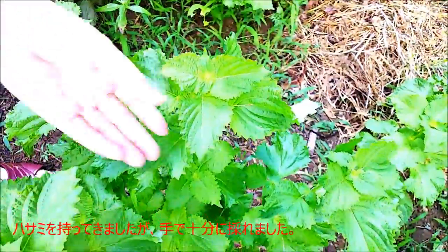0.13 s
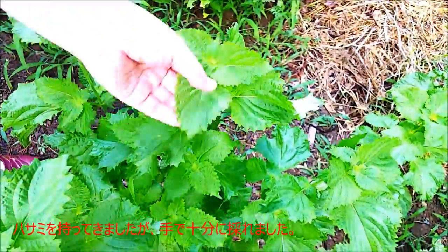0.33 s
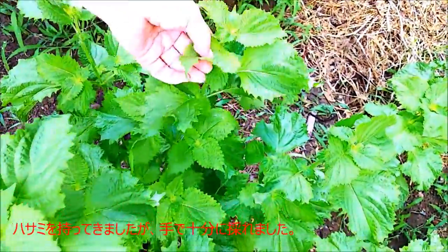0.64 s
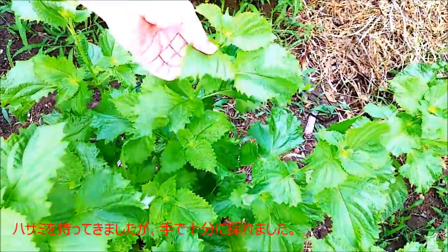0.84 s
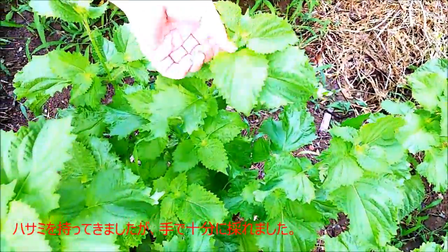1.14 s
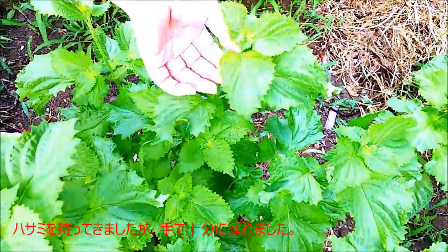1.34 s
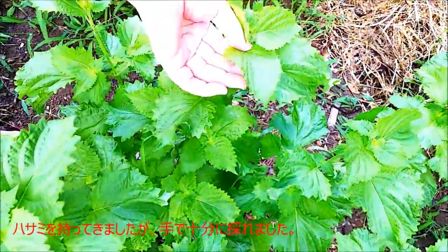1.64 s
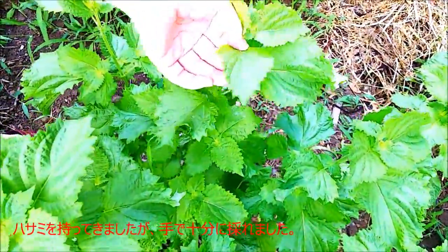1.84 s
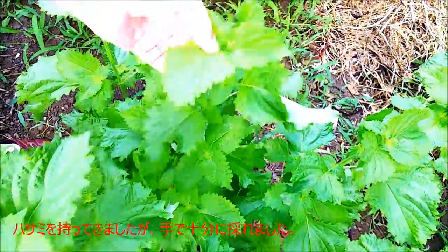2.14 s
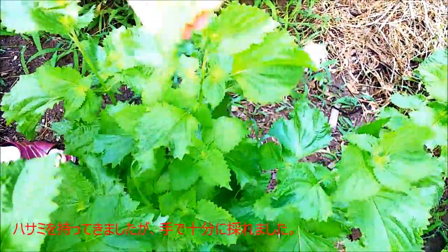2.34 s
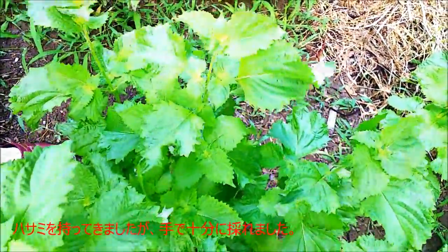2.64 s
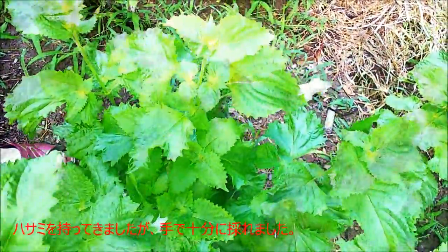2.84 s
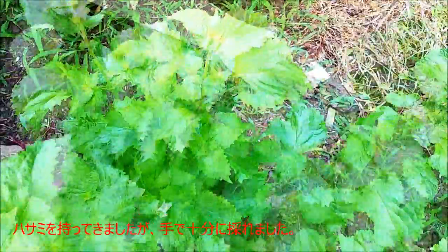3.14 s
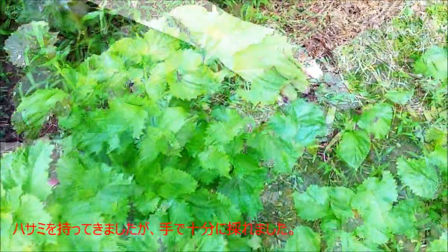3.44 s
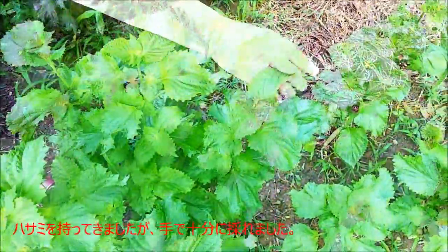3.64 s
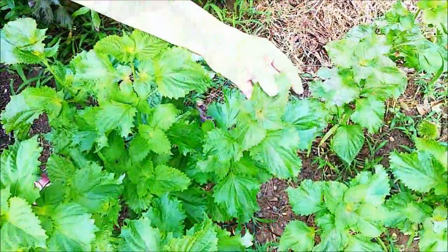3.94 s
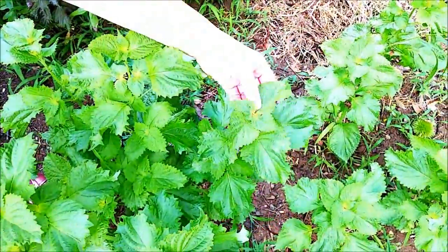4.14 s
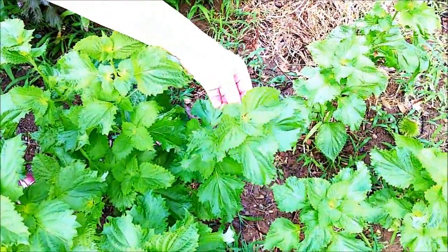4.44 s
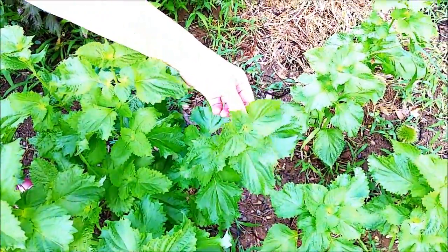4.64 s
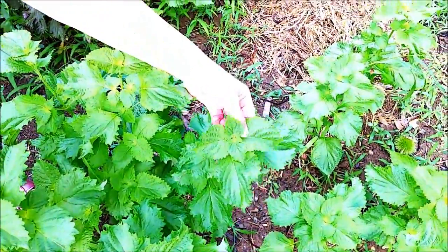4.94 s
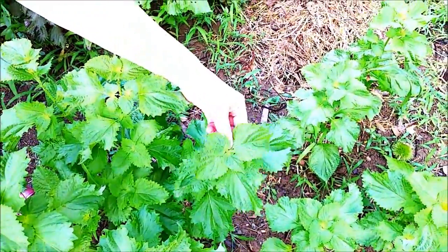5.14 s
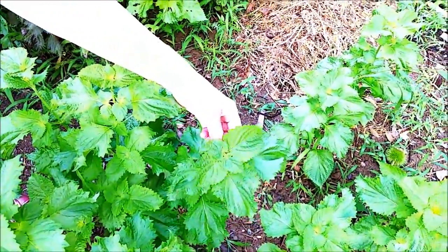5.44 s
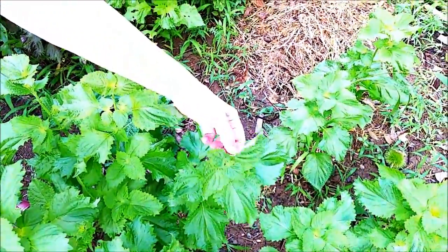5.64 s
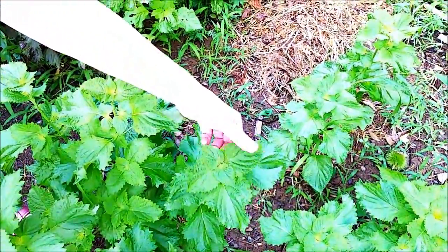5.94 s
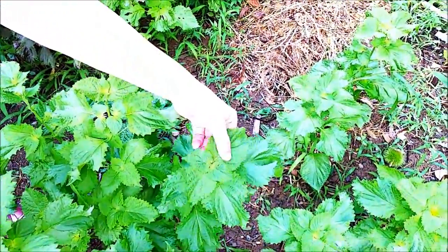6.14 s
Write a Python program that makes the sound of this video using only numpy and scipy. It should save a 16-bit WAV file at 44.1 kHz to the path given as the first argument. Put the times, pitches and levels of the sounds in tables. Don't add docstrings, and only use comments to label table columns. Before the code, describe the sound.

Shrill cicada chorus drones steadily outdoors in a garden, with faint microphone bumps, one small plant stem snap and a distant hoarse crow caw.

```python
import sys
import numpy as np
from scipy import signal
from scipy.fft import rfft, irfft, next_fast_len
from scipy.io import wavfile
from scipy.ndimage import uniform_filter1d, map_coordinates

SR = 44100
rng = np.random.default_rng(int(sys.argv[2]) if len(sys.argv) > 2 else 0)


def to_wav(sig):
    pcm = np.clip(np.atleast_2d(sig), -1, 1) * 32767
    pcm = np.round(pcm).astype(np.int16)
    wavfile.write(sys.argv[1], SR, pcm.T)


def magnitude_from_level(level_db):
    exponent = np.asarray(level_db, float) / 20
    return 10 ** exponent


N = 277830

# time in seconds, share of the second spell
SECOND_SHARE = [(0, 0), (2.56, 0), (2.59, .5), (4.06, .5), (4.09, 1), (6.3, 1)]
# frequency in Hz, level in dB per Hz.
NEAR_BODY = [
    [(4000, -31), (6800, -13.5), (7790, 0), (8540, 1), (9020, -2.5), (9370, -7.5), (10000, -42), (13000, -74), (22000, -120)],
    [(4000, -33.5), (6800, -13.5), (8270, 0.5), (8770, 1), (9330, -7.5), (9600, -11), (10000, -51.5), (13000, -49), (22000, -120)],
]
# frequency in Hz, level in dB per Hz.
FAR_BODY = [
    [(2530, -34), (4300, -10), (4660, -7.5), (5900, -4.5), (7000, 0.5), (9100, -53), (15400, -120)],
    [(2530, -43), (4300, -6), (5080, -6), (5730, -1), (6580, -2.5), (7000, -2.5), (9100, -16), (15400, -120)],
]
# frequency in Hz, level in dB per Hz.
OVERTONE = [
    [(9600, -40), (10000, -9), (10400, -7.5), (10750, -2.5), (11500, 0), (13500, -2.5), (14300, -7), (15000, -40)],
    [(9600, -40), (10000, -9), (10400, -8), (11000, -6), (11300, 0), (13500, -3.5), (14300, -7), (15000, -40)],
]
# frequency in Hz, level in dB per Hz.
TOWN = [
    [(15, -57), (25, -70), (53, -20.5), (120, -0.5), (162, -5.5), (352, -7), (573, -11), (690, -12.5), (950, -8.5), (1400, -16.5), (1820, -52), (3080, -120)],
    [(15, -58), (25, -52), (64, -16), (91, -4.5), (124, -2.5), (297, -6), (409, -12), (831, -5.5), (1070, -10.5), (1400, -13.5), (1820, -73), (3080, -120)],
]
# frequency in Hz, level in dB per Hz.
LEAVES = [
    [(710, -47), (1200, -12), (1380, -5.5), (1680, -4), (2040, -1), (3190, -1.5), (4600, -13), (5980, -45), (10100, -120)],
    [(710, -55), (1200, -11), (1310, -4.5), (2460, -0.5), (2680, 1), (3690, -1.5), (4600, -21), (5980, -66), (10100, -120)],
]
# frequency in Hz, likeness (0 to 1).
LIKENESS = [(50, 0.59), (140, .85), (400, .7), (700, 0.21), (1300, .5), (2500, 0.33), (4200, 0.13),
            (4700, .05), (14000, 0.059)]
# frequency in Hz, left minus right in dB.
LEFT_LEAN = [(60, -3), (150, -2), (700, -4), (1500, 0), (2500, 1.5), (4500, 0.5)]
# start in seconds, level in dB.
BUMPS = [
    (0.049, -52),
    (.1, -43),
    (0.151, -45),
    (.2, -41),
    (.58, -44),
]
# start in seconds, level in dB, pitch in Hz, time to fall 60 dB in seconds.
STEM_RINGS = [
    (2.1025, -33, 2400, .012),
    (2.119, -24.5, 1500, 0.013),
    (2.1192, -25.5, 2500, 0.0083),
    (2.1195, -32, 2900, 0.015),
    (2.1197, -26.5, 1250, 0.014),
    (2.1193, -32, 900, 0.019),
    (2.12, -19.5, 690, 0.022),
    (2.119, -34, 257, 0.064),
]
# time in seconds, pitch in Hz, level in dB.
CAW = [
    (3.79, 258, -70),
    (3.805, 257.4, -44),
    (3.84, 276, -44),
    (3.87, 270, -43),
    (3.92, 264, -45),
    (3.96, 262, -41),
    (3.99, 250.7, -46),
    (4.01, 250, -52),
    (4.06, 241, -70),
]
# frequency in Hz, width in Hz, level in dB.
THROAT = [
    (1340, 150, -1.5),
    (1590, 240, -1.5),
]
# frequency in Hz, step in dB.
ROUNDING_STEPS = [(50, -50), (500, -47.5), (1200, -42.5), (1700, -38.5), (2300, -35), (4600, -34),
                  (5500, -34.5), (7000, -33.5), (10500, -34), (12000, -38.5), (13500, -41), (14300, -40.5)]
# start in seconds, end in seconds.
WIDE_SPANS = [(0, .185), (.215, .39), (.55, .78), (1.13, 1.29), (1.63, 1.89), (1.96, 2.14), (2.5, 2.7),
              (2.79, 2.93), (3.16, 3.3), (3.57, 3.68), (3.85, 4.02), (4.06, 4.11), (4.31, 4.55),
              (4.61, 4.79), (4.99, 5.17), (5.21, 5.4), (5.53, 5.73), (5.83, 6.11), (6.28, 6.4)]
# frequency in Hz, share of bands (0 to 1).
STRAY_WIDE = [(4500, .2), (7000, .27), (9600, .32), (10500, 0.12), (14400, .07)]
# frequency in Hz, share of strips (0 to 1).
SILENT_STRIPS = [(1000, 0), (1400, .06), (2200, .04), (2900, .19), (5200, .21), (5800, .03), (7000, 0),
                 (11000, 0), (12000, .14), (14300, .25)]


def unit(x):
    return x / np.sqrt(np.mean(x ** 2, axis=-1, keepdims=True) + 1e-20)


def along(points, x):
    place, value = np.transpose(points)
    return np.interp(np.log(x + 1), np.log(place + 1), value)


def curves(rows):
    seconds, *columns = np.transpose(rows)
    return [np.interp(np.arange(N) / SR, seconds, column) for column in columns]


def wobble(rate):
    knots = rng.standard_normal(int(N * rate / SR) + 4)
    return map_coordinates(knots, [np.arange(N) * rate / SR])


def filtered(x, response):
    size = next_fast_len(N + 8192)
    hz = np.fft.rfftfreq(size, 1 / SR)
    return irfft(rfft(x, size) * response(hz), size)[..., :N]


def spread(pair, spectra):
    def response(hz):
        turn = np.arccos(np.clip(along(LIKENESS, hz), 0, 1)) / 2
        colour = magnitude_from_level([[along(spectrum, hz)] for spectrum in spectra])
        return colour * [np.cos(turn), np.sin(turn)]

    share, = curves(SECOND_SHARE)
    first, second = filtered(pair, response)
    mid, side = (1 - share) * first / np.linalg.norm(first) + share * second / np.linalg.norm(second)
    return np.sqrt(N) * np.array([mid + side, mid - side])


def patchy(x, patchy_db, size, count=10, order=9):
    z = signal.stft(x, nperseg=2 ** order)[2]
    field = uniform_filter1d(rng.standard_normal(z.shape[1:]), size, 0)
    field = uniform_filter1d(field, count, 1)
    z = z * magnitude_from_level(patchy_db * field / field.std())
    return signal.istft(z, nperseg=2 ** order)[1][:, :N]


def both(first_db, second_db):
    share, = curves(SECOND_SHARE)
    on = np.clip(2 * np.array([1 - share, share]), 0, 1)
    return 10 * np.log10(on[0] * magnitude_from_level(2 * first_db) + on[1] * magnitude_from_level(2 * second_db))


def clicks(rate, jitter, scatter_db, swell_db, count):
    out = np.zeros(N)
    for own in np.exp(.35 * rng.standard_normal(count)):
        gaps = SR / (rate * own) * np.exp(jitter * rng.standard_normal(N // 55))
        at = np.cumsum(gaps).astype(int)
        size = magnitude_from_level(scatter_db * rng.standard_normal(len(at))) * rng.choice([-1, 1])
        train = np.bincount(at[at < N], size[at < N], N)
        out += unit(train - train.mean()) * magnitude_from_level(swell_db * wobble(7))
    return unit(out)


def crowd(rate, far_share, swell_db):
    near = np.array([clicks(rate, jitter=.12, scatter_db=2.5, swell_db=swell_db, count=9) for _ in "ab"])
    return np.sqrt(1 - far_share) * near + np.sqrt(far_share) * rng.standard_normal((2, N))


def chorus_levels():
    t = np.arange(N) / SR
    near_db = both(-24.0, -24.0 + 0.72 * np.maximum(t - 4.7, 0))
    joining_db = 2 * np.minimum(t / 2.3, 1)
    second_start_s = SECOND_SHARE[1][0]
    fading_db = 5.5 * np.exp(-np.maximum(t - second_start_s, 0) / 1.1)
    far_db = both(-37 + joining_db, -36 + fading_db)
    overtone_db = np.interp(curves(SECOND_SHARE)[0], [0, 1], (-25.5, -26))
    return near_db, far_db - near_db, overtone_db


def cicadas():
    near_db, far_db, overtone_db = chorus_levels()
    song = crowd(300, far_share=.55, swell_db=0.9)
    overtone = spread(patchy(song, patchy_db=1.6, size=8), OVERTONE)
    near = spread(song, NEAR_BODY) + magnitude_from_level(overtone_db + 0.2) * overtone
    far_song = patchy(crowd(240, far_share=.7, swell_db=1.5), patchy_db=1.83, size=3, count=3, order=11)
    far = magnitude_from_level(far_db - 0.45) * spread(far_song, FAR_BODY)
    left_right_db = [[-1.4], [1.1]]
    return magnitude_from_level(near_db + .3 * wobble(30) + left_right_db) * (near + far)


def air():
    town_db, leaves_db = both(-53, -53), both(-46, -45)
    town = magnitude_from_level(town_db + 3.5 + 0.76 * wobble(5.01)) * spread(rng.standard_normal((2, N)), TOWN)
    patchy_hiss = patchy(rng.standard_normal((2, N)), patchy_db=2.0, size=3, count=3, order=11)
    leaves = magnitude_from_level(leaves_db + 2.02 + 0.49 * wobble(8)) * spread(patchy_hiss, LEAVES)
    half = np.array([[.5], [-.5]])

    def placing(hz):
        late = np.exp(-2j * np.pi * half * np.maximum(hz - 250, 0) * 0.00047)
        return magnitude_from_level(half * along(LEFT_LEAN, hz)) * late

    return filtered(town + leaves, placing)


def bumps():
    out = np.zeros(N)
    t = np.arange(SR // 25) / SR
    for s, db in BUMPS:
        thud = np.hanning(len(t)) * np.sin(2 * np.pi * 80 * t)
        out[round(s * SR):][:len(t)] += magnitude_from_level(db) * thud
    return np.outer([1, .1], out)


def stem():
    out = np.zeros(N)
    t = np.arange(SR // 10) / SR
    for s, db, hz, t60 in STEM_RINGS:
        onset = 1 - np.exp(-t * hz / .9)
        ring = magnitude_from_level(db - 60 * t / t60) * np.sin(2 * np.pi * hz * t)
        out[round(s * SR):][:len(t)] += ring * onset
    return out * magnitude_from_level([[-1.5], [1.5]]) + np.roll(out, 15) * magnitude_from_level([[-7], [-30]])


def crow():
    pitch_hz, db = curves(CAW)
    cycles = np.cumsum(pitch_hz * (1 + 0.035 * wobble(60))) / SR
    pulses = np.diff(np.floor(cycles), prepend=0)
    pulses = unit(pulses * magnitude_from_level(2.5 * rng.standard_normal(N)))
    breath = .5 * rng.standard_normal(N)

    def throat(f):
        return sum(magnitude_from_level(g) * 1j * f * w / (c * c - f * f + 1j * f * w) for c, w, g in THROAT) ** 2

    voice = magnitude_from_level(db) * unit(filtered(pulses + breath, throat))
    return np.array([np.roll(voice, 12), voice * magnitude_from_level(-2.0)])


def scene():
    return cicadas() + air() + bumps() + stem() + crow()


def tiles(s, hz, count, size):
    luck = rng.random((len(s) // count + 2, len(hz) // size)).repeat(count, 0)
    late = rng.integers(0, count, luck.shape[1])
    return luck[np.arange(len(s))[:, None] + late, np.arange(luck.shape[1])].repeat(size, 1)


def fold(c, s, hz, leak_db):
    wide = sum((s >= a) & (s < b) for a, b in WIDE_SPANS) > 0
    stray = tiles(s, hz, count=2, size=8) < along(STRAY_WIDE, hz)
    apart = wide[:, None] | stray | (hz < 4550)
    mono = np.array([c[0] * magnitude_from_level(3.0), c[1] * magnitude_from_level(leak_db)])
    return np.where(apart, c, mono)


def holes(s, hz):
    alone = abs(along(SECOND_SHARE, s) - .5) > .25
    share = along(SILENT_STRIPS, hz) * np.where(alone, 1.15, .5)[:, None]
    return tiles(s, hz, count=3, size=4) > share


def coarse_rounding(x, follow, drop_db):
    hop, lines, start = 1024, 672, 1024 - 167
    window = signal.windows.kaiser_bessel_derived(2 * hop, 4 * np.pi)
    phase = np.outer(np.arange(2 * hop) + .5 + hop / 2, np.arange(lines) + .5)
    basis = np.cos(np.pi / hop * phase) * window[:, None] * np.sqrt(2 / hop)
    padding = ((0, 0), (start, 3 * hop - (N + start) % hop))
    pair = np.pad([x[0] + x[1], x[0] - x[1]], padding) / 2
    blocks = pair.reshape(2, -1, hop)
    c = np.concatenate([blocks[:, :-1], blocks[:, 1:]], 2) @ basis
    hz = (np.arange(lines) + .5) * SR / (2 * hop)
    s = (np.arange(c.shape[1]) * hop + hop - start) / SR
    c = fold(c, s, hz, leak_db=-18.5) * holes(s, hz) * (hz < 14340)

    loud = np.sqrt(np.mean(c ** 2, (0, 2)) + 1e-9)
    mood_db = .8 * rng.standard_normal(len(loud))
    step = magnitude_from_level(along(ROUNDING_STEPS, hz) + mood_db[:, None])
    step = step * (loud[:, None] / np.median(loud)) ** follow
    power = ((c / step) ** 2).reshape(2, -1, lines // 16, 16)
    band = np.sqrt(np.mean(power, 3)).repeat(16, 2)
    kept = (band > magnitude_from_level(drop_db)) | (hz < 4600)
    whole = np.floor(abs(c / step) ** .75 + .4054)
    c = kept * np.sign(c) * whole ** (4 / 3) * step

    back = np.pad(c @ basis.T, ((0, 0), (1, 1), (0, 0)))
    joined = back[:, 1:, :hop] + back[:, :-1, hop:]
    mid, side = joined.reshape(2, -1)[:, start:start + N]
    return np.array([mid + side, mid - side])


def roll_off(x):
    return signal.sosfilt(signal.butter(12, 14770, fs=SR, output="sos"), x)


def record(dry):
    mix = coarse_rounding(dry, follow=.5, drop_db=-9)
    return roll_off(mix)


dry = scene()
out = record(dry)
to_wav(out)
```